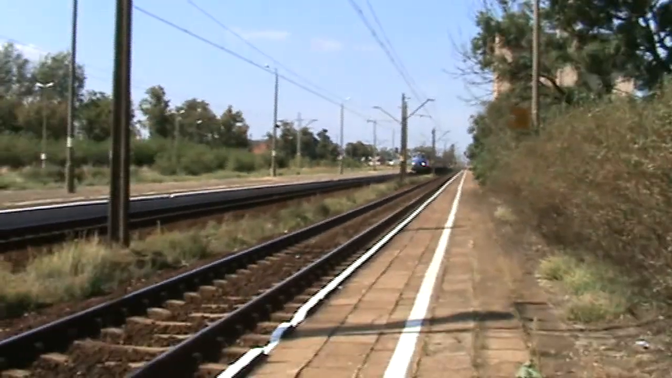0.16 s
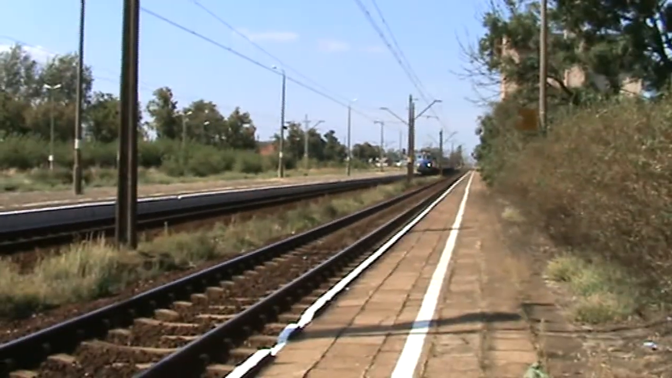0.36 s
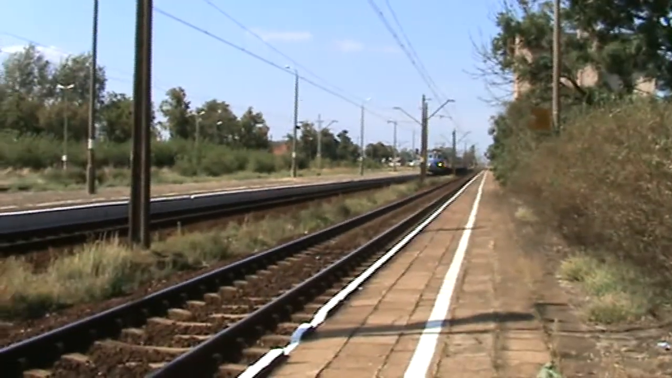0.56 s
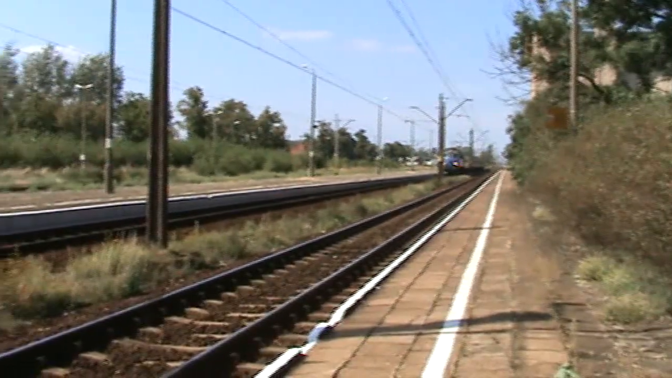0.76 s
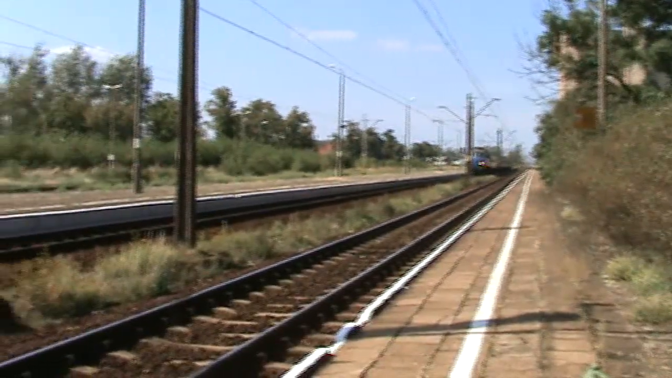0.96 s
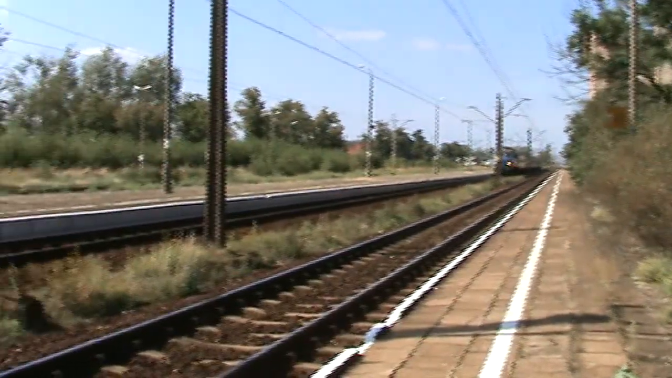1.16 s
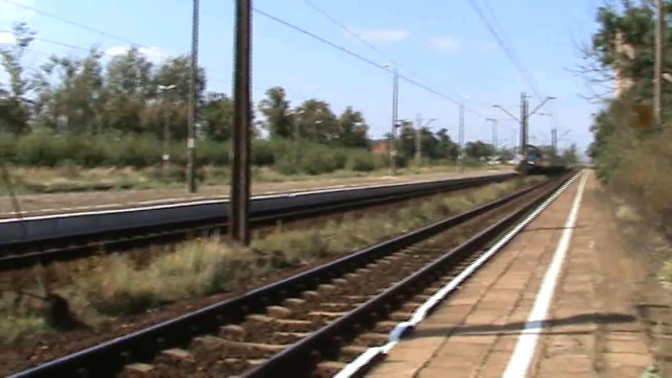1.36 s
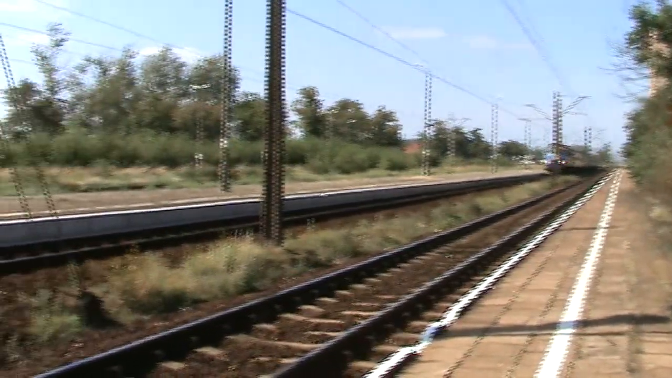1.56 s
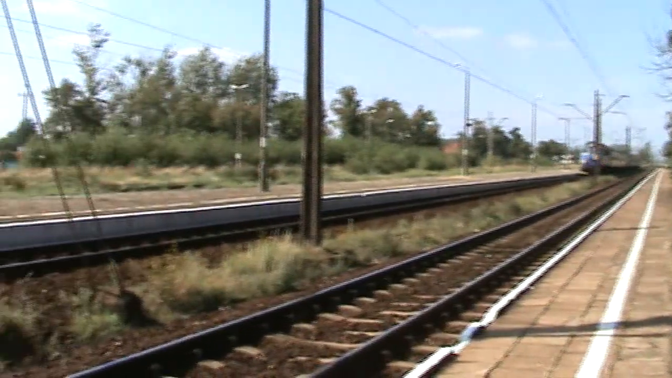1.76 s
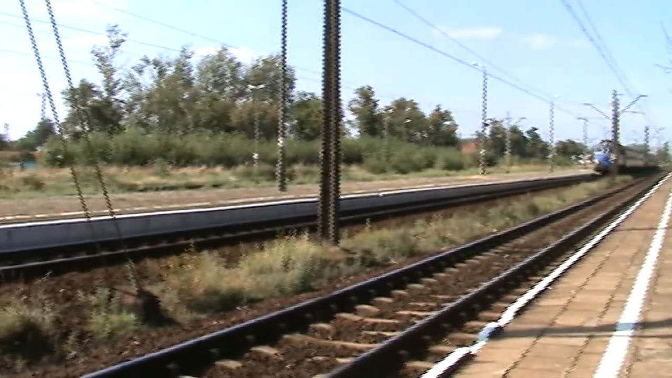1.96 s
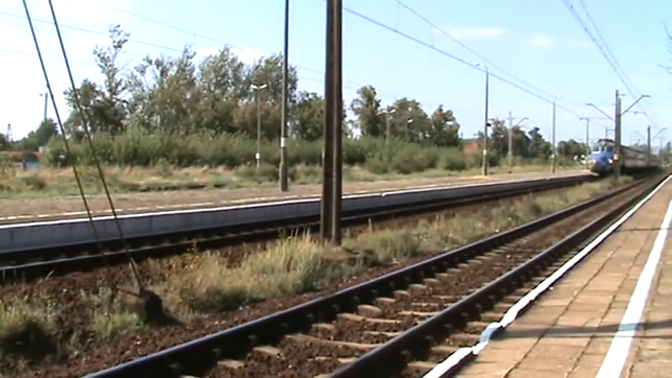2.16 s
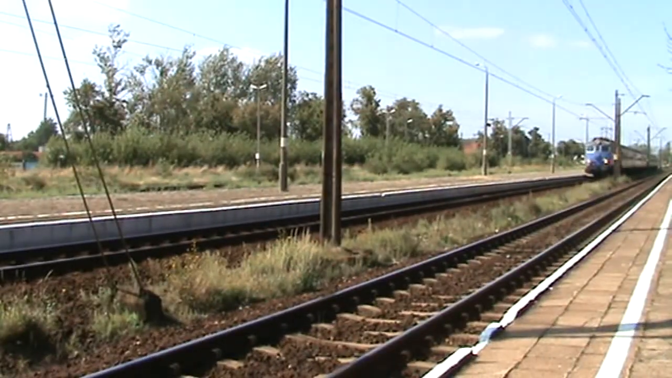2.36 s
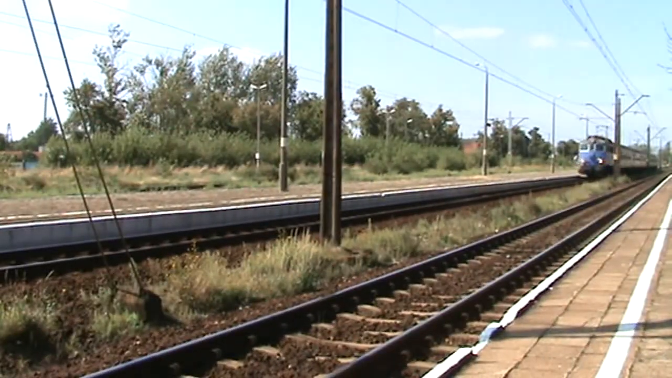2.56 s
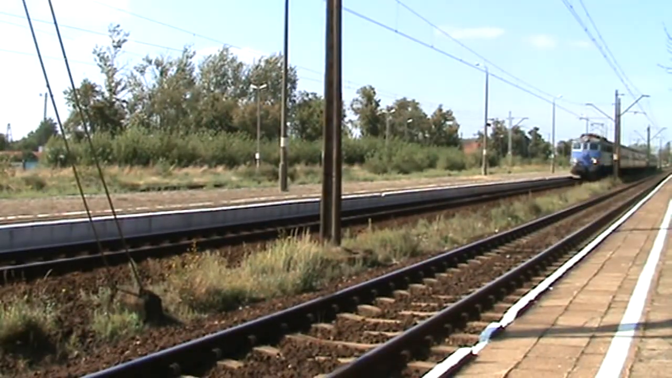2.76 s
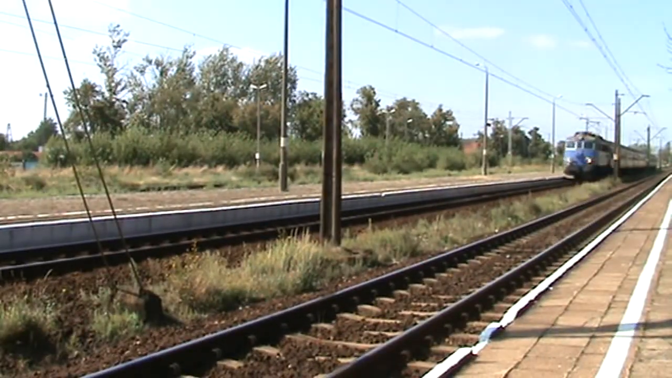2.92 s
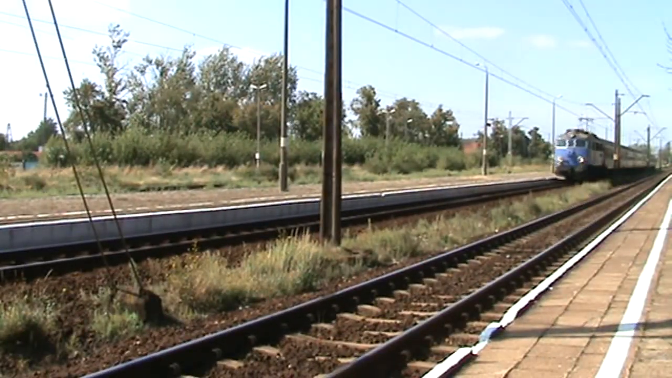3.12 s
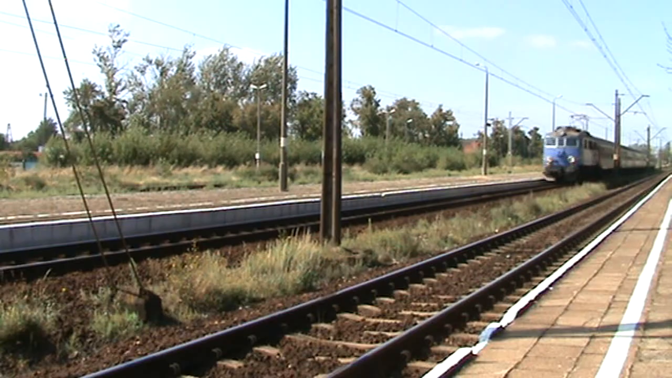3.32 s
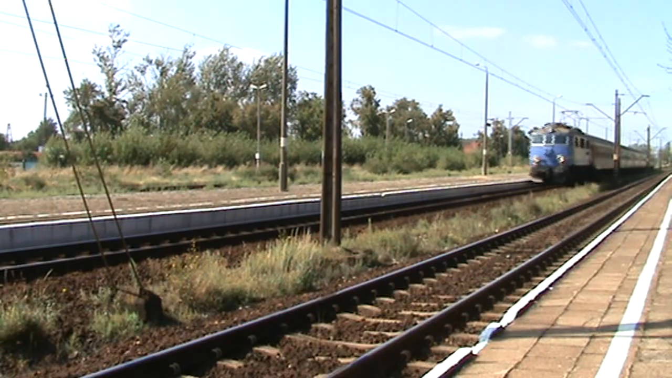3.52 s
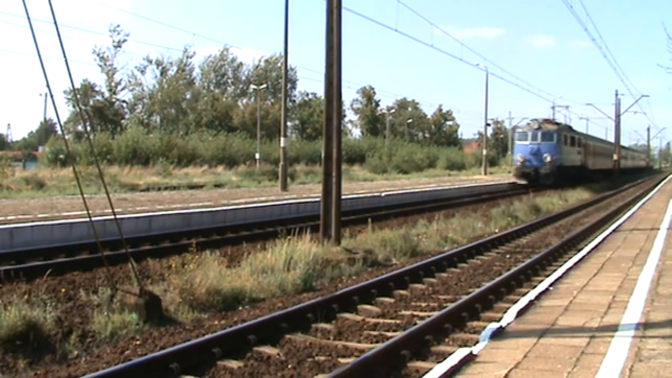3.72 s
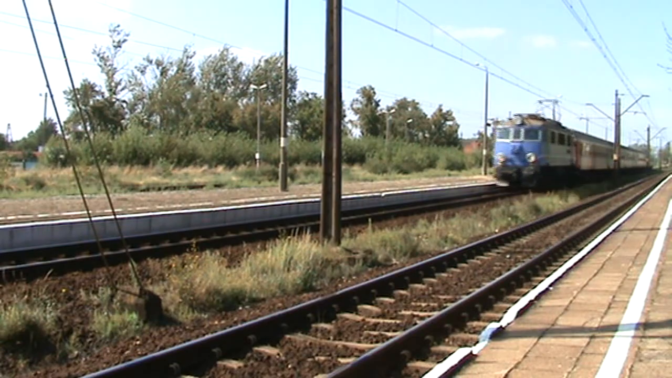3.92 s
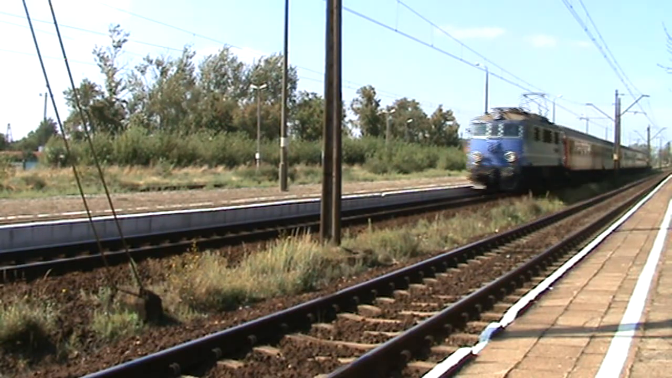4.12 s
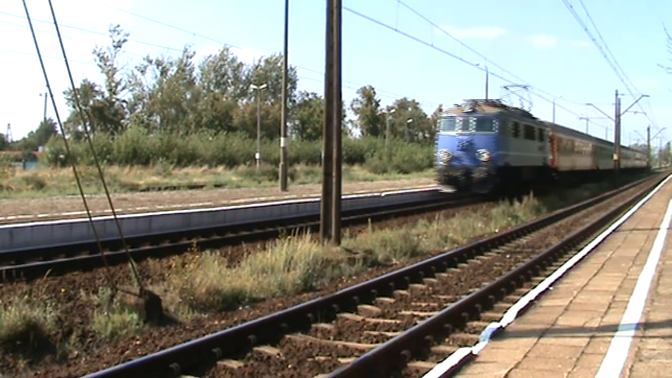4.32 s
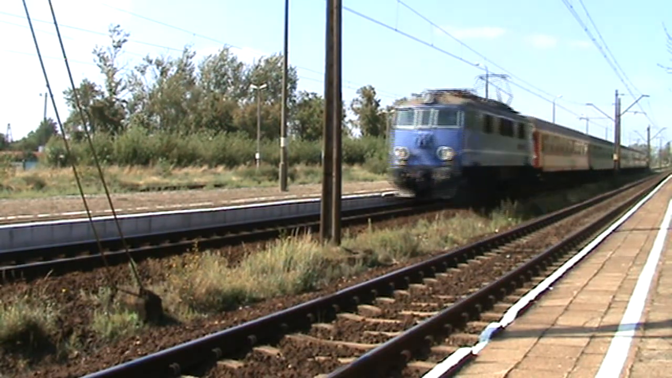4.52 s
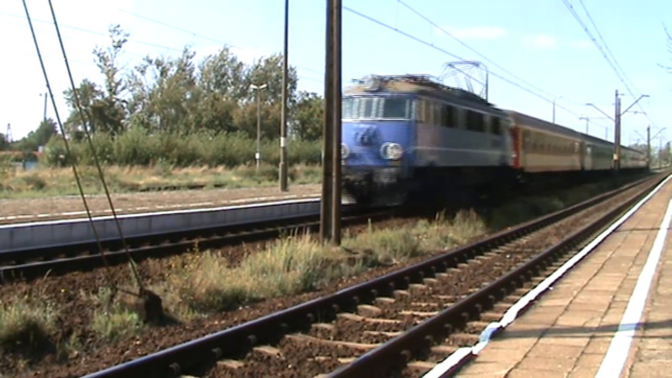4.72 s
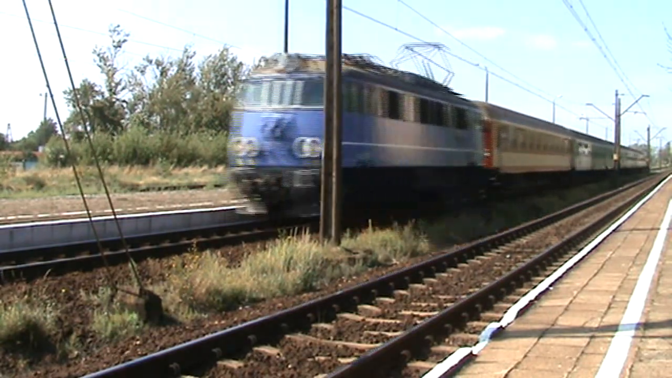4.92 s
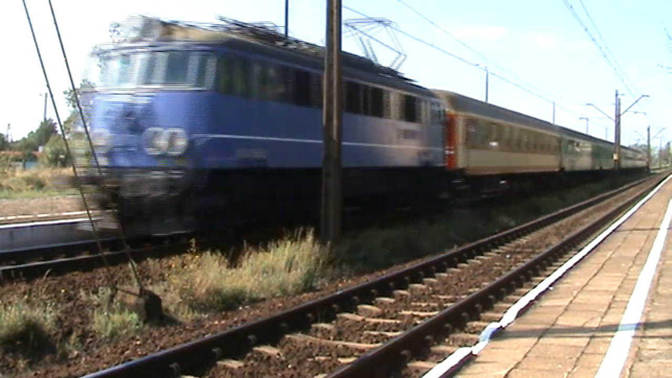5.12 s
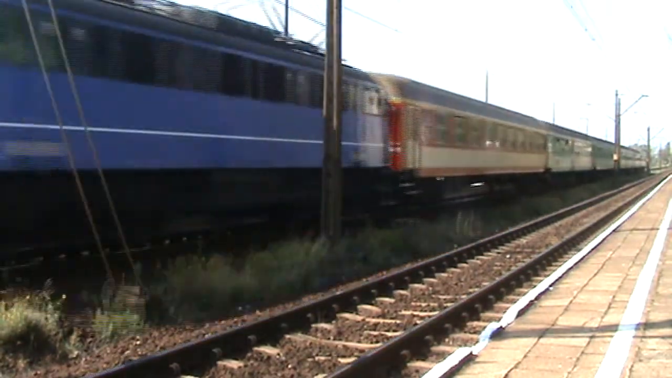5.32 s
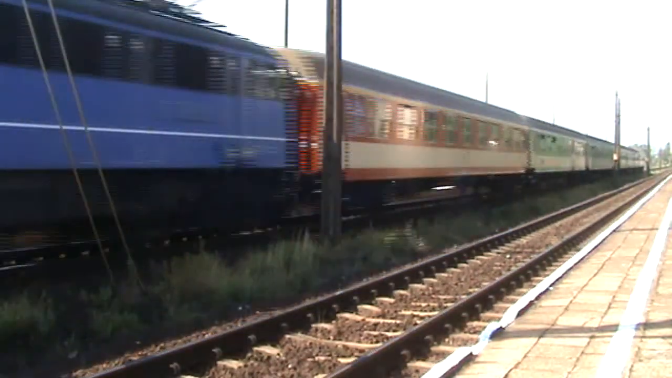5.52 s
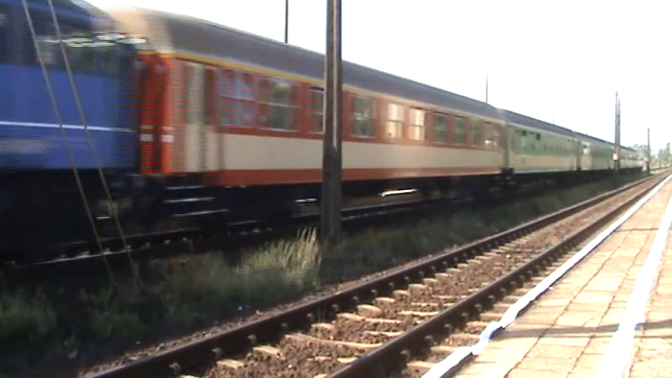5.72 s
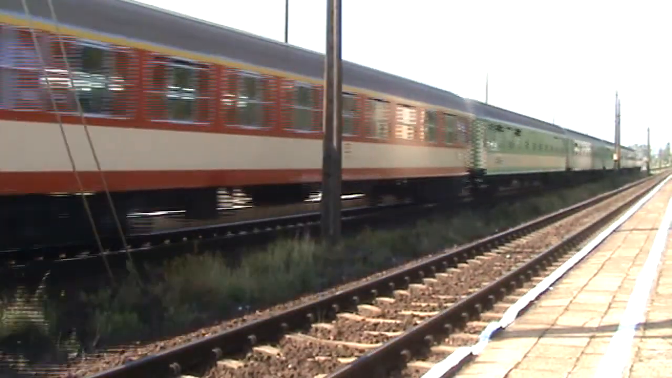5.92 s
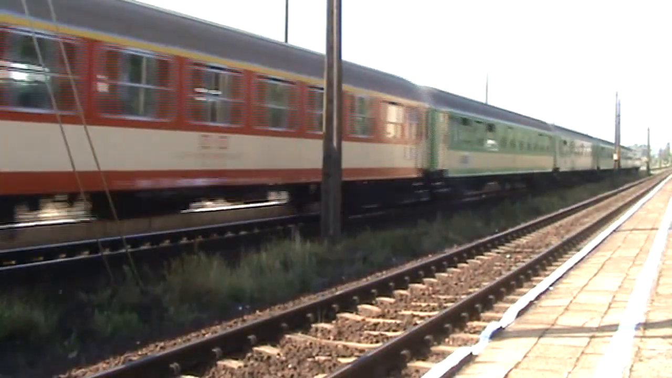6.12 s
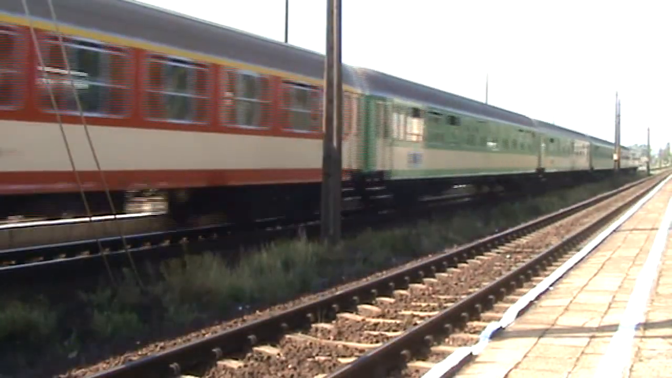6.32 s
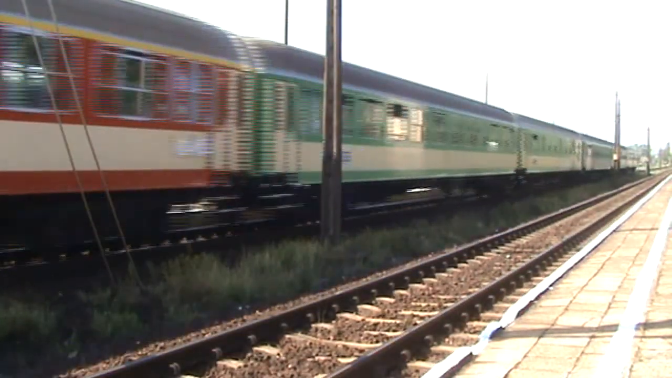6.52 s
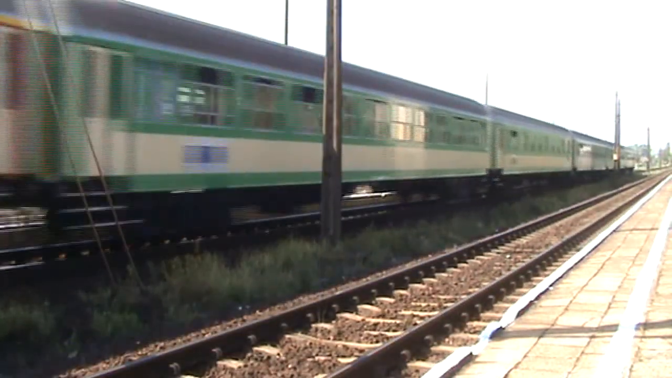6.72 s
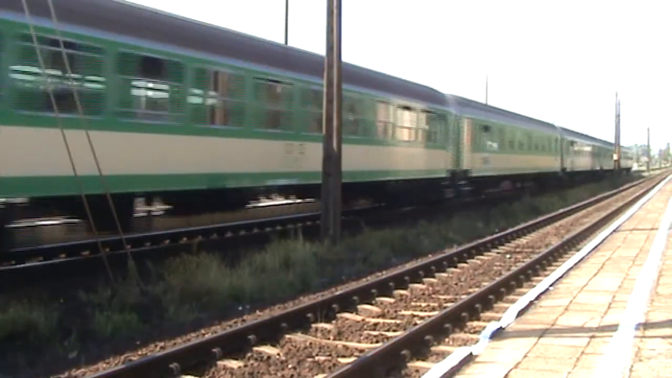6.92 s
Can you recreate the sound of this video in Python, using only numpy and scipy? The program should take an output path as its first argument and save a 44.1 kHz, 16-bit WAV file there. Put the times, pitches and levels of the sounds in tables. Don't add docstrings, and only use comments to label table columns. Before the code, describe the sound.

At an open country station, a faint low train rumble lies under a few tiny bird chirps and a dry tick. A thin high rail singing rises, with little metallic pings, then the roar swells fast. The locomotive passes close with deep pushes of air and gritty wheel noise, and coaches roll by on the left, brighter and hissing in waves. A camera microphone on the platform levels the loudness.

```python
import sys
import numpy as np
from scipy import signal
from scipy.io import wavfile
from scipy.ndimage import uniform_filter1d

SR = 44100
rng = np.random.default_rng(int(sys.argv[2]) if len(sys.argv) > 2 else 0)


def volts(x):
    e = np.asarray(x, float) / 20
    return 10 ** e


def to_wav(s):
    ch = np.atleast_2d(s).T
    pcm = np.round(np.clip(ch, -1, 1) * 32767)
    wavfile.write(sys.argv[1], SR, pcm.astype(np.int16))


N = 307368

# start in seconds, length in seconds, start, top and end pitch in Hz, level in dB.
CHIRPS = [
    (1.122, .05, 5140, 5030, 4890, -49),
    (1.583, .032, 3750, 4120, 4060, -44),
    (1.902, .016, 3960, 4140, 4200, -49),
    (1.976, .036, 4350, 4620, 4200, -46),
    (2.2, .03, 3900, 4100, 4000, -48),
]
# peak level in dB, pitch in Hz, resonance width in Hz.
TICK = (-18, 7500, 2900)
# start in seconds, level in dB, 60 dB decay time in seconds.
PINGS = [
    (2.715, -42.5, 0.089),
    (2.818, -49, 0.099),
    (3.022, -42, 0.16),
    (3.14, -47, 0.11),
]

# time in seconds, stage (0 far, 1 locomotive close, 2 coaches alongside),
# bearing (0 ahead, 1 abeam left).
PASSING = [
    (0, 0.091, 0.036),
    (2.2, 0.26, 0.065),
    (3, 0.55, 0.23),
    (4, 1.37, 0.21),
    (5, 1.244, 0.33),
    (5.5, 1.256, 0.54),
    (6, 1.51, 0.99),
    (6.97, 1.625, 0.86),
]
# time in seconds, level in dB.
ROAR_LEVEL = [(0, -38.5), (.66, -38), (1, -36), (2.25, -34.5), (2.9, -27.5), (3.4, -23), (4.2, -19.5),
              (4.9, -18), (5.6, -18), (6.1, -18), (6.97, -19.5)]
# frequency in Hz, density in dB per Hz.
FAR_COLOUR = [(15, -40), (25, -22), (61, 0), (117, -3), (154, -13), (194, -2.5), (269, -8), (721, -5),
              (1750, -11), (2030, -9.5), (2360, -15), (8580, -27), (9490, -23), (9900, -34.5),
              (13600, -80.5), (22000, -120)]
# frequency in Hz, density in dB per Hz.
LOCO_COLOUR = [(15, -34.5), (25, -17.5), (59, -10), (194, -5), (290, -15), (506, 5.5), (758, 0),
               (905, -1.5), (1260, -13), (2550, -16.5), (2750, -17.5), (7750, -25), (9490, -26.5),
               (10500, -28.5), (13600, -74), (22000, -120)]
# frequency in Hz, density in dB per Hz.
COACH_COLOUR = [(15, -49), (25, -24.5), (184, -21), (276, -9), (589, 2), (882, 4.5), (1360, -1.5),
                (1580, -11), (1880, -6.5), (2250, -10.5), (2550, -14.5), (6020, -28), (9250, -34.5),
                (10500, -43), (13600, -121), (22000, -120)]
# centre in seconds, half length in seconds, pitch in Hz, width in Hz, lift over the noise in dB.
RINGS = [(4.3, .45, 2600, 28, 12), (4.25, .5, 895, 34, 11), (3.75, .5, 1000, 150, 6),
         (4.95, .5, 440, 70, 5), (6.0, .2, 660, 50, 5), (6.6, .45, 870, 60, 6), (6.3, .35, 1550, 150, 7),
         (6.8, .25, 1660, 160, 7), (6.2, .35, 2280, 140, 3), (4.75, .1, 1900, 90, 5), (1.5, .9, 680, 90, 3),
         (4.0, .75, 790, 80, -5), (1.2, 1.5, 8650, 900, -3), (6.35, .2, 400, 120, 4),
         (1.8, 2.2, 7300, 900, 3), (4.05, .12, 40, 30, 8), (4.6, .8, 320, 70, -6), (3.3, .8, 62, 25, 4)]
PART_EDGES_HZ = (330, 1300, 4000)
# far, locomotive close and coaches alongside in dB.
PARTS_DB = [
    (-5.5, -7, -21.5),
    (-0.5, 0, -0.5),
    (-6, -9, 0.5),
    (-18.5, -14.5, -23),
]
# time in seconds, treble change in dB, length in seconds.
JOLTS = [(2.72, 3, 0.017), (2.89, 4, 0.026), (3.02, 1.5, 0.016), (3.3, 0, .02), (4.336, -3, 0.018),
         (4.39, 1, 0.011), (4.734, 2.5, 0.011), (4.85, 2, 0.019), (4.877, -4.5, 0.023), (5.13, -2, 0.015),
         (5.21, 2.5, 0.03), (5.35, -0.5, 0.028)]
# centre in seconds, half length in seconds, lift in dB.
BOGIES = [
    (2.85, .22, 3.5),
    (4.27, 0.24, 6),
    (4.75, 0.26, 5.5),
    (5.22, 0.075, 1),
    (5.4, .08, 4),
    (5.66, 0.11, 3.5),
    (5.92, 0.054, 2.5),
    (6.62, .13, 4),
    (6.92, 0.17, 5.5),
]
BOGIE_SHARES = (0.086, 0.035, 0.29, 0.92)
# centre in seconds, half length in seconds, rumble change in dB.
THUMPS = [
    (2.86, 0.06, 4),
    (4.05, 0.18, 8),
    (4.4, .07, 4.5),
    (4.85, 0.25, 3),
    (5.24, 0.032, 3.5),
    (5.66, 0.082, 1),
    (6.92, 0.086, -6),
]
# time in seconds, delay in ms, strength as a factor.
GROUND_ECHO = [
    (0, 1.68, 0.35),
    (2.4, 1.74, 0.3),
    (2.8, 1.8, 0.45),
    (3.3, 1.77, 0.37),
    (4.2, 1.77, .22),
    (5.4, 1.85, 0.02),
    (6, 1.78, 0.16),
    (6.97, 1.85, 0.078),
]
PLATFORM_ECHO = (0.34, 0.069, 0.18)

# frequency in Hz, left over right in dB.
LEAN_AHEAD = [(60, 0.5), (110, 11), (190, 5), (330, 1.5), (590, 1.5), (1050, -1), (1860, -1), (3300, -2),
              (5840, -2), (10400, 10.5)]
# frequency in Hz, left over right in dB.
LEAN_ABEAM = [(60, 5), (110, 12), (190, 11.5), (330, 12.5), (590, 11), (1050, 10), (1860, 7), (3300, 8.5),
              (5840, 5.5), (10400, -11)]
# frequency in Hz, lead in radians.
LEAD_AHEAD = [(30, 1.2), (150, 0.6), (430, 0.68), (1030, 0.69), (1640, .2), (2500, .05), (10500, .01)]
# frequency in Hz, lead in radians.
LEAD_ABEAM = [(30, 2.2), (150, 3.5), (300, 1.5), (520, 1.1), (1380, .2), (2580, .08), (10500, .01)]
# frequency in Hz, likeness (0 to 1) ahead, likeness (0 to 1) abeam.
LIKENESS = [(40, .6, .5), (130, 0.99, 0.26), (300, 0.83, 0.88), (700, 1, 0.73), (1500, 0.88, 0.88),
            (3900, 1, 0.98), (9400, 0.83, 0.88)]


def evened(x):
    return x / np.sqrt(np.mean(x ** 2) + 1e-20)


def over_hz(points, hz, column=1):
    p = np.array(points, float)
    return np.interp(np.log(hz + 1), np.log(p[:, 0] + 1), p[:, column])[:, None]


def over_time(points, t):
    s, *columns = np.transpose(points)
    return [np.interp(t, s, c) for c in columns]


def by_stage(values, t):
    return np.interp(over_time(PASSING, t)[0], np.arange(3), values)


def bumps(rows, t):
    return sum(db * np.exp(-((t - s) / half) ** 2) for s, half, db in rows)


def add(mix, s, sound):
    part = mix[round(s * SR):][:len(sound)]
    part += sound[:len(part)]


def resonate(x, hz, width_hz):
    turn = np.exp(2j * np.pi * hz * np.arange(len(x)) / SR)
    r = np.exp(-np.pi * width_hz / SR)
    return 2 * (turn * signal.lfilter([1 - r], [1, -r], x / turn)).real


def flicker(ms):
    size = int(ms * SR / 1000)
    smooth = uniform_filter1d(rng.standard_normal(N), size)
    return evened(uniform_filter1d(smooth, size))


def birds():
    out = np.zeros(N)
    for s, length, start_hz, top_hz, end_hz, db in CHIRPS:
        u = np.linspace(0, 1, int(length * SR))
        bend_hz = 2 * top_hz - (start_hz + end_hz) / 2
        hz = (1 - u) ** 2 * start_hz + 2 * u * (1 - u) * bend_hz + u ** 2 * end_hz
        whistle = np.sin(2 * np.pi * np.cumsum(hz) / SR)
        add(out, s, volts(db) * np.sin(np.pi * u) * whistle)
    return out


def tick():
    start_s, bounce_s = 2.2699, 0.0009
    db, hz, width_hz = TICK
    t, out = np.arange(300) / SR, np.zeros(N)
    snap = volts(db) * np.exp(-np.pi * width_hz * t / 2) * np.sin(2 * np.pi * hz * t)
    add(out, start_s, snap)
    add(out, start_s + bounce_s, 0.3 * snap)
    return out


def rail_song():
    mode_hz, width_hz = 9440, 200
    start_db, rise_db_per_s, full_s = -77.5, 7, 2.75
    fade_from_s, fade_db_per_s, waver_db = 4, 2, 4
    now = np.arange(N) / SR
    ring = resonate(rng.standard_normal(N), mode_hz, width_hz)
    ring = evened(resonate(ring, mode_hz, width_hz))
    rise_db = rise_db_per_s * np.minimum(now, full_s)
    fade_db = fade_db_per_s * np.maximum(now - fade_from_s, 0)
    level = volts(start_db + rise_db - fade_db + waver_db * flicker(ms=130))
    for s, db, t60 in PINGS:
        attack = np.clip((now - s) / 0.0065 + 1, 0, 1)
        level = level + volts(db - 60 * np.maximum(now - s, 0) / t60) * attack
    return level * ring


def echo_comb(hz, t):
    platform_ms, fade_hz = 1.224, 8600
    delay_ms, ground = over_time(GROUND_ECHO, t)
    platform = by_stage(PLATFORM_ECHO, t)
    turn = -2j * np.pi * hz[:, None] / 1000
    fade = np.exp(-hz[:, None] / fade_hz)
    return abs(1 + fade * (ground * np.exp(turn * delay_ms) + platform * np.exp(turn * platform_ms)))


def train_colour(hz, t, patchy_db):
    stage = np.clip(over_time(PASSING, t)[0], 0, 2)
    far, coach = np.clip(1 - stage, 0, 1), np.clip(stage - 1, 0, 1)
    loco = 1 - far - coach
    db = far * over_hz(FAR_COLOUR, hz) + loco * over_hz(LOCO_COLOUR, hz) + coach * over_hz(COACH_COLOUR, hz)
    for s, half, ring_hz, width_hz, ring_db in RINGS:
        swell = np.exp(-((t - s) / half) ** 4)
        db += ring_db * swell / (1 + (2 * (hz[:, None] - ring_hz) / width_hz) ** 2)
    patches = rng.standard_normal((len(t), len(hz))).T
    patches = uniform_filter1d(patches, size=10, axis=0)
    db += patchy_db * evened(uniform_filter1d(patches, size=8, axis=1))
    return volts(db) * echo_comb(hz, t)


def microphone_pair(hz, t):
    abeam = np.clip(over_time(PASSING, t)[1], 0, 1.2)
    ahead = 1 - abeam
    lean = volts((ahead * over_hz(LEAN_AHEAD, hz) + abeam * over_hz(LEAN_ABEAM, hz)) / 2)
    lead = ahead * over_hz(LEAD_AHEAD, hz) + abeam * over_hz(LEAD_ABEAM, hz)
    same = np.clip(ahead * over_hz(LIKENESS, hz) + abeam * over_hz(LIKENESS, hz, column=2), 0, 1)
    a, b, c, d = rng.standard_normal((len(t), len(hz), 4)).T
    left = a + 1j * b
    right = (same * left + np.sqrt(1 - same ** 2) * (c + 1j * d)) * np.exp(-1j * lead)
    mean_size = np.sqrt(lean ** 2 + lean ** -2 + 2 * same * np.cos(lead))
    return np.array([left * lean, right / lean]) / mean_size


def rolling():
    frame, hop = 2048, 512
    hz, t, now = np.fft.rfftfreq(frame, 1 / SR), np.arange(N // hop + 5) * hop / SR, np.arange(N) / SR
    colour, pair = train_colour(hz, t, patchy_db=0.8), microphone_pair(hz, t)
    above = [1 / (1 + (edge / (hz + 1)) ** 12) for edge in PART_EDGES_HZ]
    shares = -np.diff([np.ones_like(hz), *above, np.zeros_like(hz)], axis=0)

    jolt_db = sum(db * np.exp(-((now - s) / length) ** 2) for s, db, length in JOLTS)
    shake = flicker(ms=11)
    shaking_db = [0.23 * flicker(ms=60) + bumps(THUMPS, now),
                  0.1 * jolt_db + 0.18 * shake,
                  0.9 * jolt_db + 0.6 * shake,
                  1.2 * jolt_db + 0.8 * shake]

    roar_db, bogie_db = over_time(ROAR_LEVEL, now)[0], bumps(BOGIES, now)
    out = np.zeros((2, N))
    for share, part_db, bare, extra_db in zip(shares, PARTS_DB, BOGIE_SHARES, shaking_db):
        level_db = roar_db + by_stage(part_db, now) + bare * bogie_db
        part = colour * np.sqrt(np.maximum(share, 0))[:, None]
        spectrum = pair * part / np.linalg.norm(part, axis=0)
        x = signal.istft(spectrum, nperseg=frame, noverlap=frame - hop)[1][:, :N]
        out += volts(level_db + extra_db) * x / np.std(x.mean(0))
    return out


def scene():
    tick_pan = volts(np.array([[1.5], [-1.5]]))
    return birds() + tick() * tick_pan + rail_song() + rolling()


def thinned_treble(x):
    ceiling_top_hz, sag_hz, sag_from_bearing, regain_hz_per_db = 9000, 3800, 0.25, 300
    step_db, frame_wobble_db, band_wobble_db, step_from_hz = 9, 0.8, 1.5, 3000
    hz, t, z = signal.stft(x, SR, window="cosine", nperseg=1024, noverlap=512)
    size = abs(z.mean(0)) + 1e-12
    local = uniform_filter1d(np.log(size), size=28, axis=0)
    local = uniform_filter1d(local, size=5, axis=1)
    wide = np.clip((over_time(PASSING, t)[1] - sag_from_bearing) / (1 - sag_from_bearing), 0, 1)
    ceiling_hz = ceiling_top_hz - wide * (sag_hz - regain_hz_per_db * bumps(BOGIES, t))
    at_ceiling = np.exp(local[np.searchsorted(hz, ceiling_hz), np.arange(len(t))])
    wobble = evened(uniform_filter1d(rng.standard_normal(len(t)), size=2))
    bands = np.repeat(rng.standard_normal((len(t), 65)).T, 8, axis=0)[:len(hz)]
    step = at_ceiling * volts(step_db + frame_wobble_db * wobble + band_wobble_db * bands) + 1e-12
    gain = np.floor(size / step + 0.4) * step / size
    kept = z * np.where(hz[:, None] > step_from_hz, gain, 1)
    return signal.istft(kept, SR, window="cosine", nperseg=1024, noverlap=512)[1][:, :N]


def top_cut(x):
    return signal.sosfilt(signal.butter(12, 10960, fs=SR, output="sos"), x)


def record(dry):
    soft = 1.4 * np.tanh(dry / 1.4)
    low_pass = signal.firwin(255, 10900, fs=SR)
    narrow = signal.oaconvolve(soft, low_pass[None], "same")
    mix = thinned_treble(narrow)
    return top_cut(mix)


dry = scene()
out = record(dry)
to_wav(out)
```